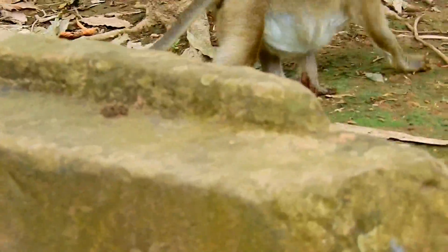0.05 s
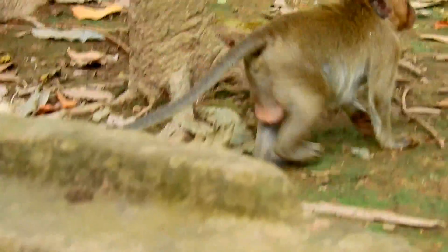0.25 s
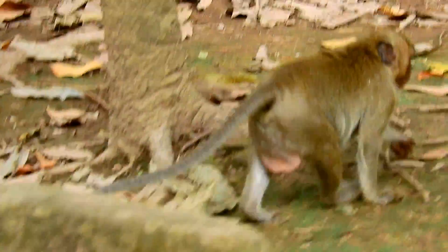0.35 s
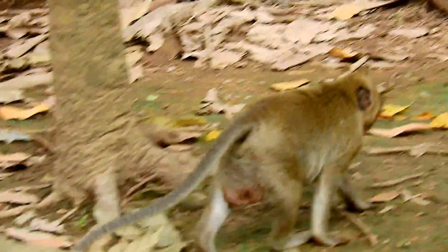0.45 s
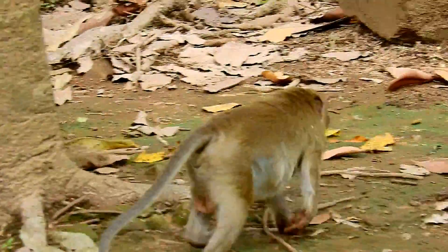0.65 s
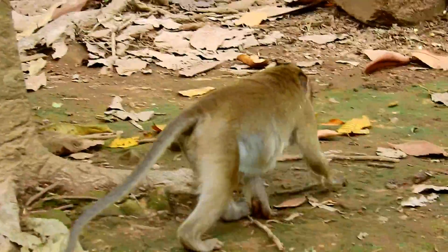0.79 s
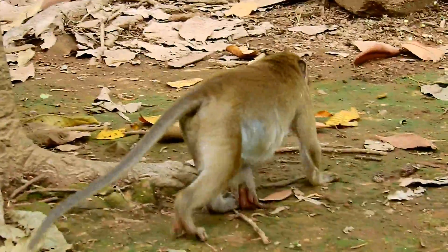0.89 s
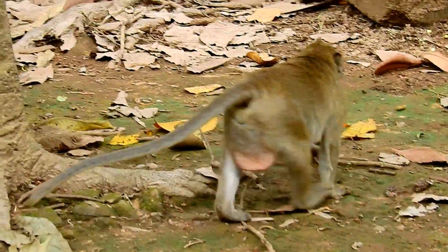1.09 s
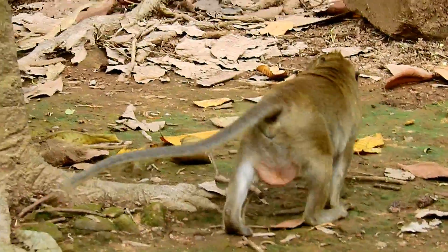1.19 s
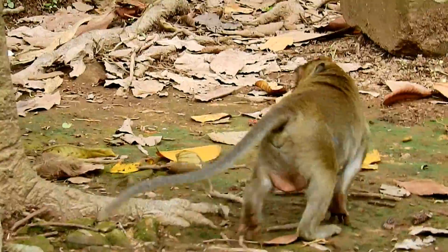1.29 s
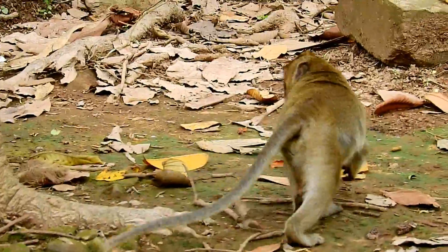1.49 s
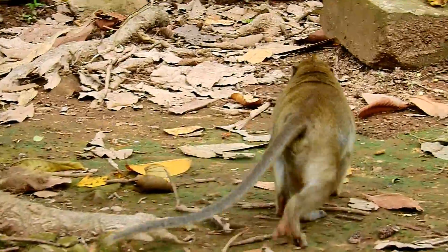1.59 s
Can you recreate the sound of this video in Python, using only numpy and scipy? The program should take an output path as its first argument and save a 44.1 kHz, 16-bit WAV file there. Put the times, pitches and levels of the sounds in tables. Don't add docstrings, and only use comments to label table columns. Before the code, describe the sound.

Close stereo leaf rustling on open ground under trees; faint crackle leads to a sharp crunch with twig snaps, then hollow husk taps, lighter rustles and one last small snap over quiet air hiss.

```python
import sys
import numpy as np
from scipy import signal
from scipy.fft import rfft, irfft
from scipy.io import wavfile
from scipy.ndimage import uniform_filter1d

SR = 44100
rng = np.random.default_rng(int(sys.argv[2]) if len(sys.argv) > 2 else 0)


def linear_from_db(decibels):
    return 10 ** (np.asarray(decibels, float) / 20)


def to_wav(s):
    ch = np.atleast_2d(s).T
    pcm = np.round(np.clip(ch, -1, 1) * 32767)
    wavfile.write(sys.argv[1], SR, pcm.astype(np.int16))


N = 72765

# start_s, rumble_db, breeze_db
SWELL = [(0, -1.5, 1), (.24, 2.5, 3.5), (.42, -3, -1), (.56, 0, -6), (.70, -0.5, 2.5), (.79, -8.5, -0.5),
         (.85, 2, 3), (1.05, -2, 0), (1.28, -3.5, -3.5), (1.45, -1.5, -0.5), (1.57, -3.5, -5.5),
         (1.65, -7, 3.5)]


def read(points, hz):
    f, value = np.transpose(points)
    return np.interp(np.log(hz + 1), np.log(f + 1), value)


def evened(x):
    return x / np.sqrt(np.mean(x ** 2) + 1e-20)


def sides(pan_db):
    return linear_from_db(np.array([[pan_db / 2], [-pan_db / 2]]))


def add(mix, start_s, sound):
    part = mix[:, round(start_s * SR):][:, :sound.shape[1]]
    part += sound[:, :part.shape[1]]


def air():
    # pitch_hz, level_db_per_hz
    spectrum = [(15, -43), (28, -20), (107, 1), (433, -15.5), (1340, -13.5), (3830, -29.5), (6560, -21.5),
                (12200, -29.5), (15500, -48)]
    # pitch_hz, correlation
    likeness = [(60, .995), (300, .992), (700, .965), (1400, .8), (3500, .3), (6800, -.3), (15000, 0.)]
    level_db, rumble_top_hz, patch_db = -66.5, 367, 2.5
    frames, hz = N // 256 + 5, np.fft.rfftfreq(1024, 1 / SR)
    a, b, c, d, patches = rng.standard_normal((frames, 513, 5)).T
    patches = uniform_filter1d(patches, size=12, axis=0)
    patches = evened(uniform_filter1d(patches, size=14, axis=1))

    same = np.clip(read(likeness, hz), -1, 1)[:, None]
    left = a + 1j * b
    right = same * left + np.sqrt(1 - same ** 2) * (c + 1j * d)
    z = np.array([left, right]) * linear_from_db(read(spectrum, hz)[:, None] + patch_db * patches)

    t = np.arange(frames) * 256 / SR
    s, rumble_db, breeze_db = np.transpose(SWELL)
    low = 1 / (1 + (hz / rumble_top_hz) ** 2)
    rumble_swell_db = np.outer(low, np.interp(t, s, rumble_db))
    breeze_swell_db = np.outer(1 - low, np.interp(t, s, breeze_db))
    z *= linear_from_db(rumble_swell_db + breeze_swell_db)
    return linear_from_db(level_db) * evened(signal.istft(z, nperseg=1024, noverlap=768)[1][:, :N])


def drones():
    # start_s, low_drone_hz, high_drone_hz
    paths = [(0, 97.5, 149), (0.249, 95.3, 124.1), (.37, 115.6, 160.2), (.62, 117.1, 150),
             (.72, 136.3, 180.2), (.9, 137, 214.7), (1.049, 89.25, 181.8), (1.349, 120.7, 215.4),
             (1.65, 139, 212)]
    levels = [-72.5, -78]
    width_hz = 24
    t, out = np.arange(N) / SR, np.zeros(N)
    s, *pitches = np.transpose(paths)
    r = np.exp(-np.pi * width_hz / SR)
    for path_hz, level_db in zip(pitches, levels):
        waver = signal.lfilter([1], np.convolve([1, -r], [1, -r]), rng.standard_normal(N))
        phase = 2 * np.pi * np.cumsum(np.interp(t, s, path_hz)) / SR
        out += linear_from_db(level_db) * (1 + 0.41 * evened(waver)) * np.sin(phase)
    swell_s, rumble_db, _ = np.transpose(SWELL)
    return out * linear_from_db(np.interp(t, swell_s, rumble_db))


def ground(x):
    echo_db, t60_s, gap_s, density = -8, 0.053, .002, .15
    t = np.arange(4000) / SR
    taps = rng.standard_normal(len(t)) * (rng.random(len(t)) < density)
    taps *= linear_from_db(-60 * t / t60_s) * (t > gap_s)
    taps /= np.linalg.norm(taps)
    return x + linear_from_db(echo_db) * signal.fftconvolve(x, taps[None], axes=1)[:, :N]


def husk():
    # peak_s, level_db, rise_s
    knocks = [
        (0.681, -57.5, 0.0092),
        (.715, -85, 0.017),
        (.745, -62, 0.0086),
        (0.772, -46.5, 0.017),
        (0.822, -55, 0.0058),
        (0.874, -43.5, 0.022),
        (.935, -90, 0.0061),
    ]
    # pitch_hz, level_db, t60_s
    modes = [(1314, 0, .3), (2200, -15, .35)]
    out, t = np.zeros((2, N)), np.arange(SR // 2)[None] / SR
    for peak_s, level_db, rise_s in knocks:
        start_s, ring = peak_s - rise_s, 0
        for hz, mode_db, t60_s in modes:
            ring = ring + linear_from_db(mode_db - 60 * t / t60_s) * np.sin(2 * np.pi * hz * (t + start_s))
        add(out, start_s, sides(-2.5) * linear_from_db(level_db) * np.minimum(t / rise_s, 1) * ring)
    return out


def grain(hz, turns, chance):
    # pitch_hz, phase_rad
    ports = [(500, 0.), (3000, .2), (4500, -1.6), (6500, -2.8), (9000, -3.1), (13000, -1.8)]
    # pitch_hz, spread_rad
    scatter = [(500, .08), (1500, .48), (3000, .9), (6500, 1.25), (8300, .8), (13000, 1.3)]
    t = np.arange(400) / SR
    u = t * hz / turns
    lead_rad = read(ports, hz) + chance * read(scatter, hz)
    return u * np.exp(1 - u) * np.sin(2 * np.pi * hz * t + np.array([[.5], [-.5]]) * lead_rad)


def twigs():
    # start_s, peak_db, pitch_hz, left_right_db, ring_cycles
    snaps = [(.2, -33, 1340, 2, 0.94), (0.2098, -34.5, 2240, 5, 1.2), (.5651, -67, 6660, -4, .6),
             (0.6365, -45, 1730, -11.5, 0.46), (1.0548, -36.5, 2850, -10.5, 0.79),
             (1.1385, -44, 7250, 2, 2.4), (1.3458, -57.5, 1720, 4, 2.9), (1.3764, -47, 1653, -10, 0.69),
             (1.605, -50.5, 2860, -15, 1.05), (.2158, -32.5, 2110, 11, 2.1), (.238, -34, 1393, 2, 2.5),
             (.2455, -33, 1580, 8, 1.4), (.2635, -37, 6500, -2, 1.5), (.2955, -43.5, 736, 1.5, 0.55),
             (.325, -40, 6500, -3, 1.5), (.386, -41, 6800, 1.5, 1.1), (.4465, -51.5, 2530, -7, 0.88),
             (.8404, -38, 6750, -8, 5.1), (0.8796, -38.5, 1646, 1, 2.1), (.942, -49, 1382, 0, 2.1),
             (.988, -50, 2200, 5, 1.8), (1.081, -51, 1540, 14, 1.8), (1.113, -56, 1710, 18, 2.5),
             (1.143, -39, 4540, 1, 1.4), (1.396, -62, 1280, -2, 1.3), (1.4285, -53, 1380, 3, 1),
             (1.4335, -53, 2510, 12, 3.2), (1.479, -55, 2970, 12, 1.74), (1.6155, -52, 2210, -14, 1.7),
             (1.6272, -37, 5270, 1, 3.7)]
    low_hz, high_hz = 573, 9000
    out = np.zeros((2, N))
    for start_s, peak_db, hz, pan_db, turns in snaps:
        add(out, start_s, linear_from_db(peak_db) * sides(pan_db) * grain(hz, turns, chance=0.18))
    return signal.sosfilt(signal.butter(2, [low_hz, high_hz], "band", fs=SR, output="sos"), out)


def swarm(colour, low_hz, high_hz, per_s, spread_db, turns, count, size):
    height = linear_from_db(spread_db * np.minimum(rng.exponential(1, size), 4))
    height *= (rng.random(size) < per_s / SR) * rng.choice([-1, 1], size)
    which, out = rng.integers(0, count, size), np.zeros((2, size))
    for k, hz in enumerate(np.geomspace(low_hz, high_hz, count)):
        tap = grain(hz, turns, rng.standard_normal())
        out += signal.oaconvolve((height * (which == k))[None], hz * tap, axes=1)[:, :size]
    colour_gain = linear_from_db(read(colour, np.fft.rfftfreq(size, 1 / SR)))
    return evened(irfft(rfft(out) * colour_gain, size))


def pressure(treads):
    t, power = np.arange(N) / SR, np.zeros((2, N))
    for peak_s, rise_s, level_db, fade_db_per_s, pan_db in treads:
        swell_db = 20 * (t - peak_s) / max(rise_s, .002)
        fade_db = -abs(fade_db_per_s) * (t - peak_s)
        shape_db = np.where(t < peak_s, swell_db, fade_db)
        power += (sides(pan_db) * linear_from_db(level_db + shape_db)) ** 2
    return np.sqrt(power)


def curls():
    # peak_s, rise_s, level_db, fade_db_per_s, pitch_hz
    leaves = [(.305, 0.049, -68.5, 204, 570), (0.647, 0.004, -63.5, 110, 5860),
              (0.832, 0.024, -58.5, 185, 3700), (0.867, 0.01, -45.5, 158, 6710),
              (0.883, 0.041, -50, 233, 2070), (0.942, 0.015, -54.5, 303, 1447),
              (0.992, 0.043, -55.5, 180, 2070), (1.2, .012, -54, 250, 4380), (1.068, 0.048, -58, 204, 1550),
              (1.133, 0.062, -64.5, 218, 860), (1.40, 0.019, -61.5, 119, 4710),
              (1.433, 0.015, -64, 257, 2450), (1.484, 0.026, -72, 209, 3000),
              (1.611, 0.025, -64, 241, 2210), (1.627, 0.012, -51.5, 702, 5620),
              (.87, 0.022, -50.5, 191, 3060), (0.877, 0.0095, -50.5, 393, 1670),
              (1.607, 0.013, -65.5, 296.5, 3420), (0.866, 0.0084, -49, 220, 4780),
              (.24, 0.041, -48, 300, 1320), (0.596, 0.012, -73, 198, 940), (0.67, 0.016, -65.5, 150, 5260),
              (1.08, 0.015, -74, 304, 1900), (1.4, 0.034, -73, 300, 1500), (1.491, 0.018, -70.5, 253, 5300),
              (1.63, 0.005, -68.5, 500, 10500), (0.55, 0.011, -72, 252, 8800),
              (.252, 0.022, -49, 402, 2700), (.24, .03, -46, 200, 4400), (0.75, .004, -51, 254, 6800)]
    pans = [0, -1, 7, -13, 3.5, -1, 9.5, -1, 10, 3, -1, 9, 12, -13.5, -15, 7.5, 5, -21, -6, -3, 1, 0, -1,
            -2, -4, -8, 1, 10, 2, -1]
    # share_of_pitch, level_db
    spectrum = [(.5, -34), (.8, -10), (1., 0), (1.2, -10), (1.5, -30), (2.5, -50)]
    out = np.zeros((2, N))
    for (*tread, hz), pan_db in zip(leaves, pans):
        colour = [(share * hz, db) for share, db in spectrum]
        cracks = np.zeros((2, N))
        burst = swarm(colour, 0.825 * hz, 1.129 * hz, per_s=3500, spread_db=2.5, turns=1.53,
                      count=5, size=SR // 2)
        add(cracks, tread[0] - 0.1, burst)
        out += cracks * pressure([(*tread, pan_db)])
    return out


def crackle():
    # peak_s, rise_s, level_db, fade_db_per_s, left_right_db
    slides = [(.0, .02, -52, 105, 0), (.06, 0.063, -50.5, 85, 5), (.125, 0.073, -60.5, 175, -17.5),
              (.224, 0.012, -34, 132, -2), (.262, 0.034, -32, 173, -0.5), (.36, 0.11, -46.5, 161, -1.5),
              (.41, 0.049, -73, 309, 6), (.515, 0.024, -62, 203, -3.5), (.72, 0.016, -66, 75, 5),
              (.785, 0.076, -49.5, 83, 0), (.845, 0.0047, -50, 194, -10), (.89, 0.028, -46.5, 137, -0.5),
              (.99, 0.038, -49, 74, 4.5), (1.09, 0.14, -57, 75, 3), (1.14, 0.097, -44, 204, 5.5),
              (1.19, 0.03, -53.5, 258, -2), (1.49, .03, -65.5, 157, 3), (.385, .02, -55, 201, 3),
              (.567, 0.0054, -60.5, 300, -1.5), (1.345, .04, -66.5, 150, -1), (1.42, 0.015, -65, 80, 4),
              (1.626, 0.0077, -52.5, 302, 1)]
    # pitch_hz, level_db
    colour = [(1500, -32.5), (3800, -12), (5500, -8), (6800, 1.5), (7500, -5.5), (8600, -20), (12000, -35),
              (15500, -45)]
    fine = swarm(colour, low_hz=2514, high_hz=12830, per_s=14000, spread_db=2.5, turns=1.14,
                 count=28, size=N)
    return fine * pressure(slides)


def crunch():
    # peak_s, rise_s, level_db, fade_db_per_s, left_right_db
    treads = [(.03, 0.17, -61.5, 112, 6.5), (.075, 0.06, -62, 113, -6.5), (.125, 0.13, -71, 154, -11),
              (.212, 0.015, -37.5, 171, 2), (.232, 0.021, -40, 195, 1), (.254, 0.026, -41, 352, 1),
              (.30, 0.021, -52.5, 146, 4.5), (.40, 0.041, -70, 96, -17), (.645, 0.004, -66, 89, -10.5),
              (.72, 0.041, -60, 83, 3.5), (.785, 0.023, -64.5, 101, -9), (.86, 0.043, -52, 110, 1),
              (.992, 0.046, -56, 168, 6.5), (1.075, 0.046, -57, 148, -1), (1.13, 0.097, -59, 245, 15),
              (1.36, 0.14, -67, 90, 3), (1.434, 0.07, -63, 111, 3)]
    # pitch_hz, level_db
    colour = [(400, -33), (720, -13), (1150, 1.5), (2200, -1), (3500, -5.5), (5000, -52), (9000, -28),
              (15000, -38)]
    coarse = swarm(colour, low_hz=489, high_hz=6085, per_s=6000, spread_db=2.0, turns=1.41,
                   count=24, size=N)
    return coarse * pressure(treads)


def scene():
    background = air() + drones()
    bending = ground(crunch() + curls())
    breaking = ground(crackle() + twigs())
    return background + husk() + breaking + bending


def band_limit(x):
    return signal.sosfilt(signal.butter(12, 15660, fs=SR, output="sos"), x)


def record(dry):
    cut = signal.sosfilt(signal.butter(2, 55, "high", fs=SR, output="sos"), dry)
    return band_limit(cut)


dry = scene()
out = record(dry)
to_wav(out)
```